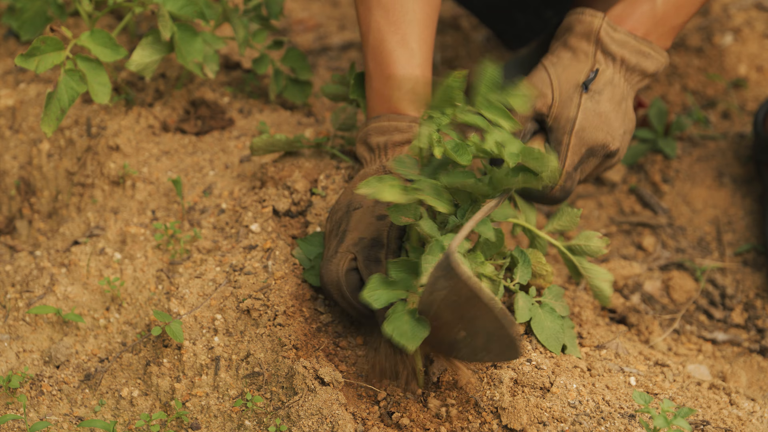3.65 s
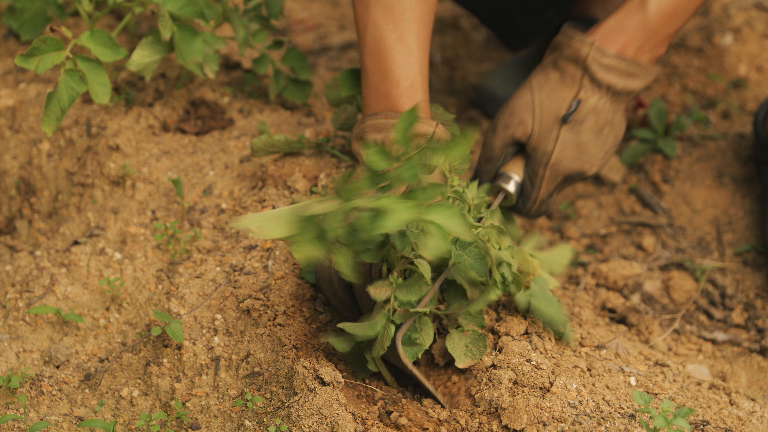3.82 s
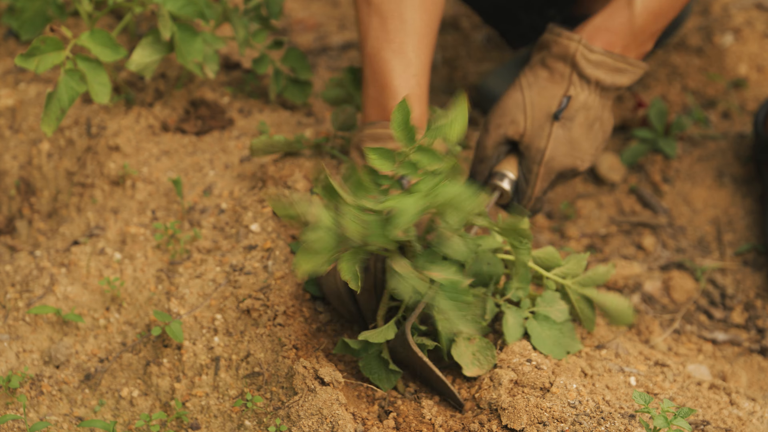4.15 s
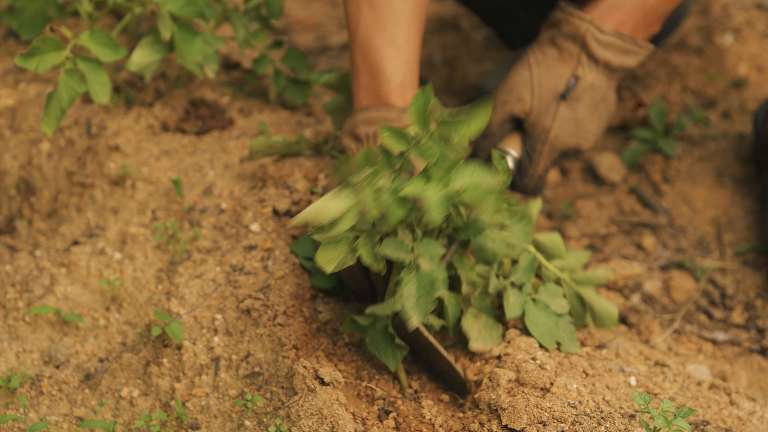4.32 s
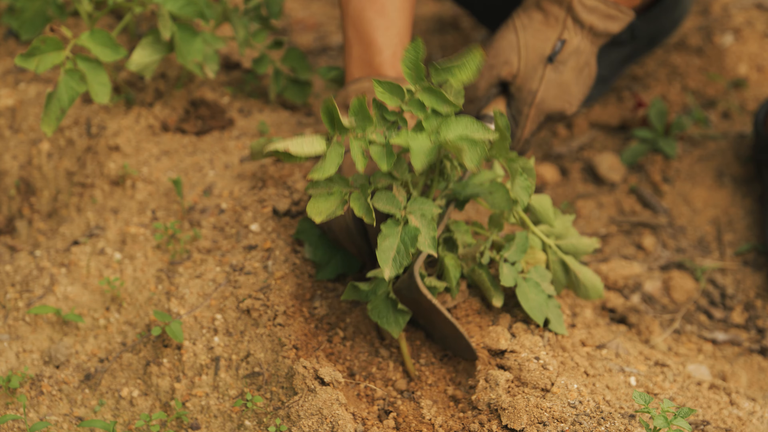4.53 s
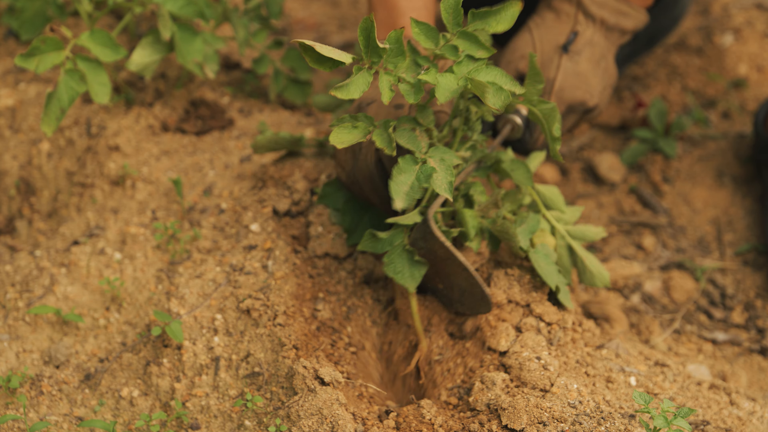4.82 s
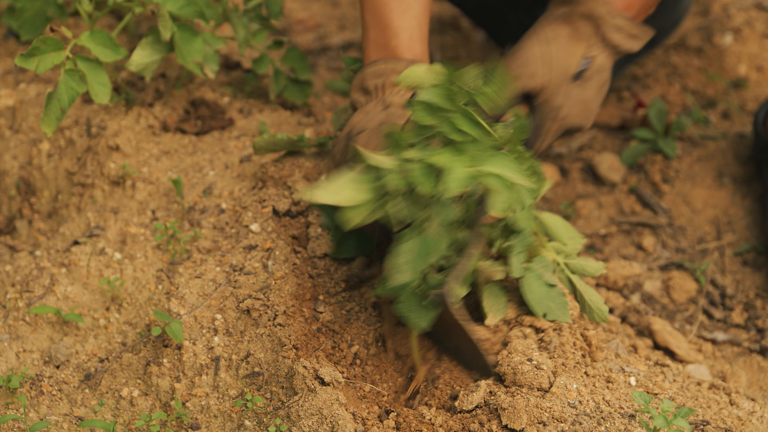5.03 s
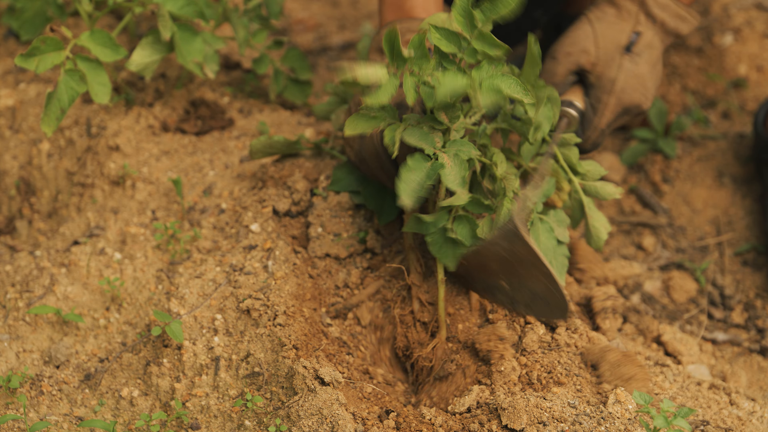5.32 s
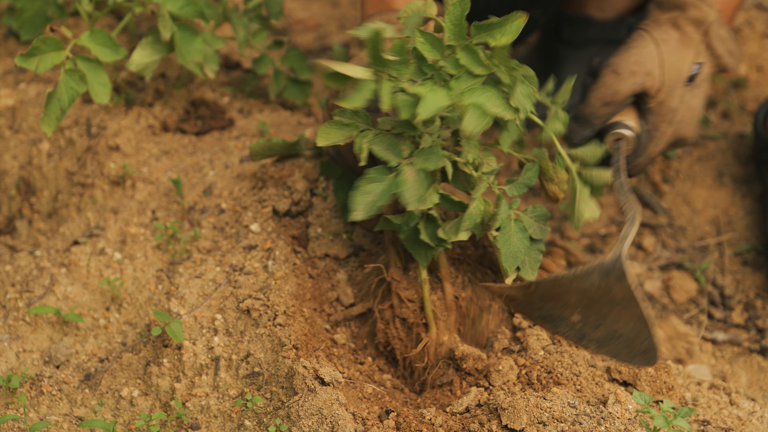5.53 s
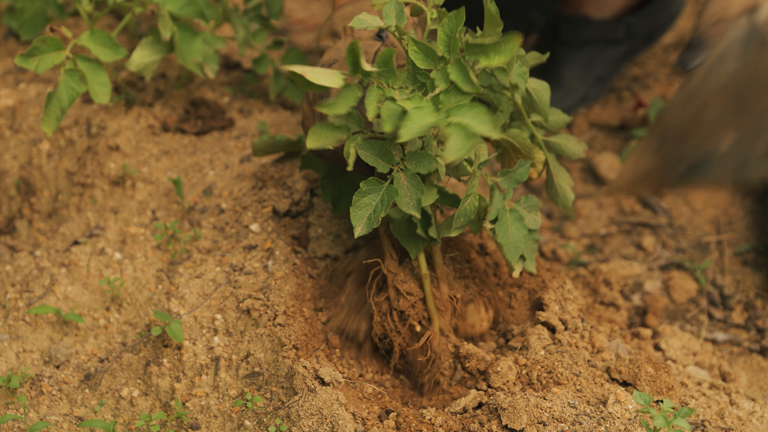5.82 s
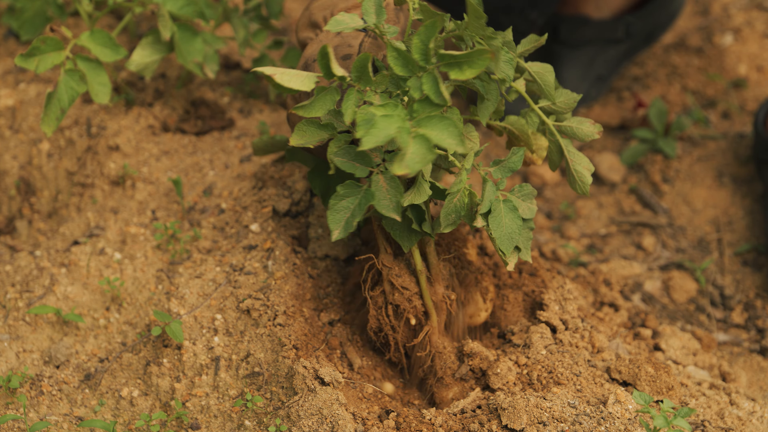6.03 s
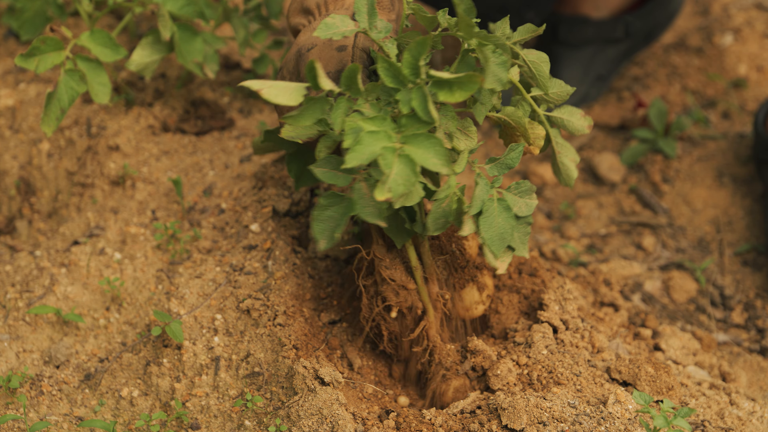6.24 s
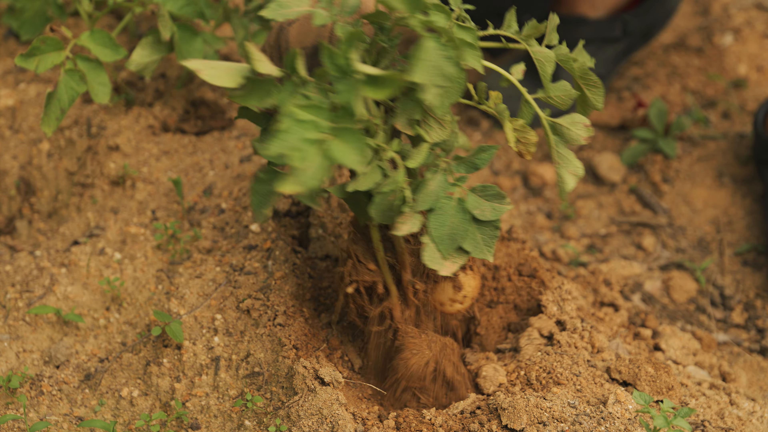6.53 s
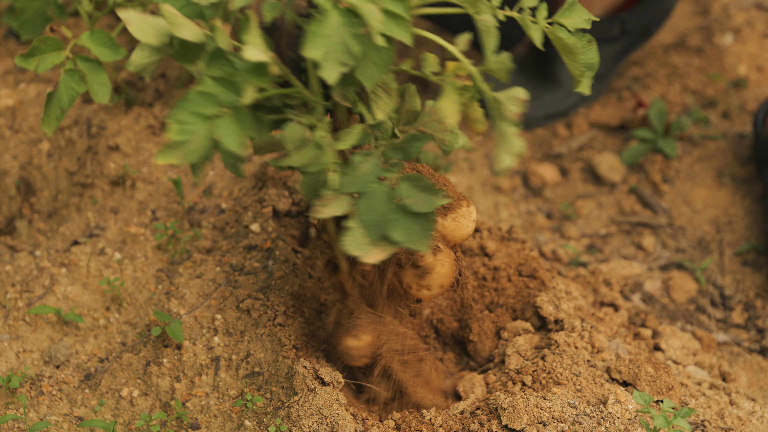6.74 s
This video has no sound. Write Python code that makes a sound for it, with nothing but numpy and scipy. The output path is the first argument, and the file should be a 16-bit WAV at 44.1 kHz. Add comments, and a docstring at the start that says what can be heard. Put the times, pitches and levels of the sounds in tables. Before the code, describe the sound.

A small steel hoe grinds through dry sandy soil close to the microphone, outdoors in a field. Stones and roots crack, and an early hard shove crushes clods with a dull thud. Lighter scrapes follow, then brighter strokes where the blade rings and pebbles tap the metal. The digging weakens and stops, leaving trickling soil, low leaf rustle, a few faint bird whistles and a barely audible distant motor hum.

```python
"""A small steel hoe works dry sandy soil close to a microphone in a field where leaves rustle low.
From the start the blade grinds through sand by stick-slip friction, stones and roots crack, and pebbles
tap the steel. Near 1 s the hardest shove crushes clods and thuds in the ground. From about 3.6 s the
blade often slides free and rings in its own modes. The strokes weaken and end near 6 s, while a few
birds whistle faintly and the hum of a far motor swells, then sinks just before the end."""
import sys
import numpy as np
from scipy import signal
from scipy.fft import rfft, irfft
from scipy.io import wavfile
from scipy.ndimage import uniform_filter1d, map_coordinates

SR = 44100
rng = np.random.default_rng(int(sys.argv[2]) if len(sys.argv) > 2 else 0)


def inscribe(sig):
    """Save sig as 16-bit PCM at rate SR to the path in sys.argv[1].

    A 1-D sig is mono; a 2-D sig holds one channel per row.
    Samples are clipped to [-1, 1] before scaling.
    """
    pcm = np.round(np.clip(np.atleast_2d(sig).T, -1, 1) * 32767)
    wavfile.write(sys.argv[1], SR, pcm.astype(np.int16))


N = 303350
TIME = np.arange(N) / SR

# modes of the steel blade: (frequency [Hz], bandwidth [Hz], level [dB])
BLADE_MODES = [(985, 70, -10), (1390, 120, -12), (1530, 90, -12), (1960, 60, -11), (2255, 35, -2),
               (2770, 60, -9), (3130, 50, -1), (3200, 50, -4), (3530, 32, 1), (4025, 60, -8),
               (4390, 50, -9), (4790, 50, -7), (5000, 100, -4), (5990, 50, -9), (6550, 160, -11),
               (7300, 70, -15), (7880, 70, -9), (8630, 90, -14), (9270, 110, -15), (9570, 70, -15),
               (10300, 60, -9), (10850, 70, -19), (11380, 65, -12), (12450, 110, -18), (13400, 130, -20),
               (14080, 90, -21)]
# strokes through the soil: (peak time [s], rise [s], fall [s], grit level [dB],
# then relative to the grit: clods [dB], fine sand [dB], rustle [dB], blade ring [dB])
STROKES = [(0.019, 0.39, 0.1, -33, -7.5, -7, -32, -35), (0.3, 0.14, 0.13, -36.5, -6.5, 1.5, -6.5, -22),
           (0.48, 0.055, 0.15, -32.5, -13, -4, -21, -30), (0.535, 0.11, 0.062, -31, -11, 2.5, -27, -3.5),
           (1.018, 0.12, 0.22, -25.5, -7.5, -2, -29, -30), (1.132, 0.026, 0.016, -35, 5.5, 10, -14, -30),
           (1.267, 0.036, 0.085, -36.5, 3, 1, -0.5, -30), (1.48, 0.22, 0.096, -44.5, 5, 8.5, -15, -30),
           (1.601, 0.15, 0.066, -36, -4.5, 2, -10, -30), (1.767, 0.11, 0.14, -34.5, -4.5, 3, -13.5, -30),
           (2.005, 0.031, 0.086, -40.5, -30, 11, -23, 3.5), (1.9, 0.054, 0.43, -52, -23, 7, 3.5, -30),
           (3.56, .06, 0.072, -58, -8, -23, 13, -30), (2.496, 0.06, 0.041, -48, -27, 17, -22, -30),
           (2.584, 0.082, 0.15, -41, -32, 2.5, -25, -30), (2.675, 0.05, 0.047, -39, -8, -8, -26, -30),
           (2.81, 0.04, 0.18, -39, -9, -6.5, -21, -30), (2.89, 0.08, 0.31, -44.5, -27, -1, -30, -30),
           (3.168, 0.1, 0.11, -41.5, -17, 2, -4.5, -30), (3.506, 0.057, 0.082, -35, 1, -9, 0.5, -30),
           (3.66, 0.075, 0.09, -36.5, 2.5, -16, -15, 3.5), (3.699, 0.087, 0.039, -37, -2, -5, -16, 4),
           (3.815, 0.06, 0.086, -25, -3, -8.5, -18, -1), (3.996, 0.053, 0.12, -33, -3.5, -13, -16, 1.5),
           (4.045, 0.13, 0.037, -37, -14, -9, -29, 2), (4.13, 0.054, 0.065, -29, 0.5, -11, -19, 0.5),
           (4.26, 0.1, 0.076, -41.5, -6, -21, -28, -30), (4.835, 0.053, 0.12, -42.5, -24, -11.5, -11, -4),
           (4.885, 0.12, 0.059, -46, -19, -17, -13, -9), (5.07, 0.16, 0.26, -46, -9.5, -8, -30, -30),
           (5.17, 0.13, 0.065, -41, -10, -29, -26, -20), (5.223, 0.13, 0.053, -32.5, -7, -18, -16.5, 5),
           (5.285, 0.022, 0.045, -41, -26, -5, -23, -1), (5.495, 0.088, 0.18, -47.5, 2, -16, -22, 4),
           (5.539, .02, .05, -57, -3, 4, -14, 8), (5.655, 0.11, 0.11, -48.5, -8.5, -11.5, -22, -5),
           (5.7, 0.098, 0.062, -47, -12, -14, -22, -10)]


def undb(db):
    """Amplitude ratio of a level in decibels."""
    return 10 ** (np.asarray(db) / 20)


def unit(x):
    """Normalisation to rms 1."""
    return x / np.sqrt(np.mean(x ** 2))


def band(x, lo_hz, hi_hz):
    """Band-pass filtering with gentle skirts."""
    sos = signal.butter(2, [lo_hz, min(hi_hz, .45 * SR)], "bandpass", fs=SR, output="sos")
    return signal.sosfilt(sos, x)


def resonate(x, modes):
    """Parallel resonators, each (frequency [Hz], bandwidth [Hz], level [dB]); roughly keeps white rms."""
    out = sum(undb(db) * signal.lfilter(*signal.iirpeak(hz, hz / width, SR), x)
              for hz, width, db in modes)
    return out / np.sqrt(sum(undb(db) ** 2 * np.pi * width / SR for _, width, db in modes))


def wander(rate_hz):
    """Slow random modulation of rms 1: held values, smoothed twice."""
    hold = int(SR / rate_hz)
    steps = np.repeat(rng.standard_normal(N // hold + 1), hold)
    return unit(uniform_filter1d(uniform_filter1d(steps, hold), hold)[:N])


def curves(table):
    """Linear interpolation of each column over the times in the first."""
    times, *columns = np.transpose(table)
    return [np.interp(TIME, times, column) for column in columns]


def grains(per_s, spread_db, top_db, tail_s, bed_db):
    """Shot-noise envelope: random impacts, mostly small, decay exponentially over a steady bed."""
    chance = rng.random((2, N))
    size_db = np.minimum(-spread_db * np.log(1 - chance[1]), top_db)
    impacts = (chance[0] < per_s / SR) * undb(size_db)
    tails = signal.lfilter([1], [1, -np.exp(-1 / (tail_s * SR))], impacts)
    return unit(unit(tails) + undb(bed_db))


def stroke_envelope(gains, power=1):
    """Strokes add in energy; at power 1 each climbs about 20 dB in its rise and loses it in its fall."""
    rounding, curvature = .027, .85
    peak, rise, fall = np.transpose(STROKES)[:3, :, None]
    lag = TIME[::64] - peak
    distance = lag / np.maximum(np.where(lag < 0, rise, fall), .01)
    effort = undb(-20 * power * (np.hypot(distance, rounding) - rounding) ** curvature)
    return np.interp(TIME, TIME[::64], np.sqrt(np.square(gains) @ effort ** 2))


def grinding(jerks):
    """Stick-slip friction: the blade shears sand in jerks, and each grain size also flickers alone."""
    peak, _, _, db, clod_db, fine_db, _, ring_db = np.transpose(STROKES)
    buried = 1 / np.sqrt(1 + undb(ring_db) ** 2)  # energy in the free blade is lost to the soil
    forces = []
    for gain in size_gains(peak, db, clod_db, fine_db):
        grit = grains(per_s=160, spread_db=-1, top_db=10, tail_s=.0012, bed_db=15.5)
        forces.append(jerks * grit * stroke_envelope(gain * buried) * undb(.89 * wander(30)))
    return shifting_mix(soil_noise(forces))


def size_gains(time, db, clod_db, fine_db):
    """Grain size distribution: amplitudes of grit, clods, small grit and fine sand."""
    # small grit over the mean of the grit and fine sand levels: (time [s], level [dB])
    small_grit = [(0, -8), (.5, -9.5), (.8, -3), (1.05, -6.5), (1.25, 1.5), (1.5, -23), (1.8, 2), (2.2, -9),
                  (2.55, 3.5), (2.9, 4), (3.2, -7), (3.6, 1), (3.85, -0.5), (4.2, 3.5), (4.8, 5),
                  (5.2, 0.5), (5.7, -1), (6.88, 1.5)]
    small_db = fine_db / 2 + np.interp(time, *np.transpose(small_grit))
    return undb([db, db + clod_db, db + small_db, db + fine_db])


def soil_noise(forces):
    """Incoherent sources: each grain size rattles as independent noise in its own band."""
    # bands of grit, clods, small grit and fine sand: (low edge [Hz], high edge [Hz])
    size_bands = [(1503, 3610), (488, 1326), (3060, 7370), (5560, 10900)]
    return sum(band(force * rng.standard_normal(N), lo, hi) * np.sqrt(SR / 2 / (hi - lo))
               for force, (lo, hi) in zip(forces, size_bands))


def shifting_mix(x, depth_db=1.6):
    """Spectral modulation: as the mix of grain sizes changes, patches of the spectrum swell and sink."""
    spectrum = signal.stft(x, nperseg=512)[2]
    patches = uniform_filter1d(rng.standard_normal(spectrum.shape), size=9, axis=0)
    patches = unit(uniform_filter1d(patches, size=3, axis=1))
    gain = undb(depth_db * patches - .115 * depth_db ** 2)  # the offset keeps the mean power
    return signal.istft(spectrum * gain, nperseg=512)[1][:N]


def blade_rubbing(jerks):
    """Forced vibration: friction drives the freed blade; each mode swells alone as the contact moves."""
    contrast, damping = .7, 1.4  # rubbing evens out the modes and widens them
    _, _, _, grit_db, _, _, _, ring_db = np.transpose(STROKES)
    friction = jerks * stroke_envelope(undb(grit_db + ring_db), power=1.29) * rng.standard_normal(N)
    norm = np.sqrt(sum(undb(contrast * db) ** 2 * width for _, width, db in BLADE_MODES))
    out = np.zeros(N)
    for hz, width, db in BLADE_MODES:
        mode = resonate(friction * undb(3 * wander(60) - 1), [(hz, damping * width, 0)])
        out += undb(contrast * db) * np.sqrt(width) / norm * soil_loading(mode)
    return out


def soil_loading(mode, bend=.003):
    """Mass loading: soil on the blade makes the pitch of a mode wander slightly."""
    shift = bend * SR / 60 * wander(10)
    return map_coordinates(mode, [np.arange(N) + shift], mode="mirror")


def cracking():
    """Brittle fracture: stones and roots snap with a pitched tick; crushed clods swell and splinter."""
    # stones and roots: (time [s], peak [dB], relative clods [dB], relative fine sand [dB], pitch [Hz])
    cracks = [(0.063, -14, -17, -15, 2770), (0.16, -23, 4, -10, 2020), (0.214, -26.5, -12, 13, 2470),
              (0.2743, -18, -5, -3, 2670), (0.44, -27, -15, -9, 2520), (0.583, -27, -6, 9, 3510),
              (0.7116, -35.5, -14, 17.5, 2570), (0.758, -20.5, -20, -5, 2900), (0.778, -23, -26, -14, 2700),
              (0.9615, -16, -14, 0, 2500), (0.819, -21, -28, -8, 3130), (0.83, -22, -30, -11, 2640),
              (0.971, -7.5, -7, -7, 2400), (1.0017, -6, -13, -9, 2540), (1.031, -18, 6.5, -8, 2900),
              (1.1283, -21, -8, 11, 1170), (1.1992, -30, 16, -13, 1220), (1.232, -39, -9, 14, 1040),
              (1.255, -15.5, 7, -2, 2550), (1.3117, -27.5, 4, 9.5, 1160), (1.599, -28, -21, -8, 1806),
              (1.7578, -24, -9, 5, 1910), (1.773, -41, -10, 7, 3000), (1.7663, -15, 6, -18, 1450),
              (1.853, -18.5, -17, -3, 1580), (1.88, -28, -17, 9.5, 3210), (1.947, -33, -17, 12, 2220),
              (1.982, -38, -20, -7, 3460), (2.0923, -40, -3, 17, 1240), (2.1256, -28, -22, -15, 1570),
              (2.17, -29, -8, -4, 2100), (2.200, -29, -18, 5, 1900), (2.295, -31.5, -4, -13, 2300),
              (2.4369, -38.5, -22, 21, 3520), (2.459, -26, -11, 16.5, 3060), (2.4864, -20.5, -17, 1, 3400),
              (2.576, -25, -23, -4, 2340), (2.663, -20.5, -26, 7, 2900), (2.794, -18, -24, -20, 2600),
              (2.816, -18.5, -16, 4, 2960), (2.883, -15.5, -34, -14, 3100), (2.9242, -21.5, -16, -23, 2920),
              (2.996, -30.5, -10, 6, 3140), (3.0219, -39, -16, 13, 2490), (3.054, -27, -20, 6.5, 3330),
              (3.229, -28, -12, 4.5, 2810), (3.2406, -29, -16, 0, 1850), (3.429, -33, -13, 1, 1530),
              (3.4507, -34, 1, -9, 1120), (3.72, -20, -11, -12, 3520), (3.7822, -23, 6, -13, 3510),
              (3.797, -9, -12, -2, 3200), (3.847, -13, -6, -21, 2550), (3.9813, -18.5, -10, -23, 1800),
              (4.0248, -17, 0, -14, 1580), (4.1111, -9.5, -23, -2, 3300), (4.397, -28, -13, -26, 2380),
              (4.988, -33, -1, -8, 1710), (5.2695, -41, -20, 12, 3500), (5.535, -39, -15, 7, 3130),
              (5.638, -26.5, -18, -17, 3200), (5.663, -33, -14, -16, 3190), (6.157, -35, -13, -18, 3590),
              (6.7283, -31, -18, -18, 1680)]
    # crushed clods: (start [s], peak [s], end [s], level [dB],
    # relative clods [dB], relative fine sand [dB])
    crunches = [(.901, .9025, .916, -24, -5, 4), (.907, .917, .9245, -20.5, -1, 1),
                (2.542, 2.554, 2.566, -28, -14, 4), (2.64, 2.661, 2.67, -29, -14, 2),
                (3.125, 3.135, 3.162, -29, -10, 2), (3.466, 3.472, 3.487, -36, 13, -10)]
    crack_t60_s, crumb_t60_s, crumb_db = .006, .035, -15
    tick_db, tick_t60_cycles = -11, 30
    forces, ticks, t = np.zeros((4, N)), np.zeros(N), TIME[:SR // 10]
    crumbs = undb(crumb_db) * 1000. ** (-t / crumb_t60_s)
    decay = (1000. ** (-t / crack_t60_s) + crumbs) / 3  # noise peaks near three times its rms
    for time, db, clod_db, fine_db, hz in cracks:
        span = slice(int(time * SR), int(time * SR) + len(t))
        forces[:, span] += size_gains(time, db, clod_db, fine_db)[:, None] * decay
        tick = 1000. ** (-t * hz / tick_t60_cycles) * np.sin(2 * np.pi * hz * t)
        ticks[span] += undb(db + tick_db) * tick
    splinters = grains(per_s=2500, spread_db=2.5, top_db=8, tail_s=.0004, bed_db=4)
    for start, peak, end, db, clod_db, fine_db in crunches:
        crush = np.interp(TIME, [start, peak, end], [0, 1, 0]) * splinters
        forces += undb(db + np.array([[0], [clod_db], [fine_db / 2], [fine_db]])) * crush
    return soil_noise(forces) + ticks


def clump_bursts():
    """Band-limited noise: like-sized grains give way together and rattle around one pitch."""
    # clumps of grit: (start [s], peak [s], end [s], level [dB], pitch [Hz], bandwidth [Hz])
    clumps = [(0.44, .443, .455, -39, 2500, 700), (0.457, 0.478, .5, -43, 2900, 600),
              (0.487, 0.511, .525, -30.5, 1460, 1210), (0.54, .55, .556, -35, 5000, 300),
              (.669, 0.674, .686, -36, 9300, 3000), (0.947, 0.99, 1.075, -28, 2720, 1640),
              (1.028, 1.033, 1.042, -21.5, 900, 398), (1.022, 1.05, 1.075, -31, 6900, 1500),
              (1.701, 1.71, 1.712, -30, 2500, 500), (1.708, 1.713, 1.719, -25, 2230, 900),
              (1.74, 1.74, 1.75, -24.5, 1640, 1400), (1.41, 1.415, 1.43, -36, 8000, 4000),
              (1.81, 1.826, 1.835, -31, 9100, 5000), (1.983, 2.002, 2.02, -32, 3100, 1300),
              (3.129, 3.133, 3.155, -24, 6700, 2500), (3.692, 3.692, 3.703, -30, 3020, 2480),
              (3.78, 3.81, 3.85, -28.5, 4850, 900), (3.975, 3.99, 4.01, -37, 5100, 1200),
              (5.15, 5.181, 5.19, -39, 3750, 700), (5.275, 5.289, 5.298, -39, 3780, 1500),
              (5.48, 5.485, 5.51, -49, 8900, 1500), (5.838, 5.888, 5.945, -43, 1440, 1100),
              (6.052, 6.085, 6.11, -54, 1300, 500)]
    out = np.zeros(N)
    rattle = grains(per_s=1100, spread_db=8, top_db=8, tail_s=.0011, bed_db=14) * rng.standard_normal(N)
    for start, peak, end, db, hz, width in clumps:
        span = slice(int(start * SR), int(end * SR) + 512)
        corners = [start, max(peak, start + .001), max(end, peak + .001)]
        burst = np.interp(TIME[span], corners, [0, 1, 0]) * rattle[span]
        out[span] += undb(db) * band(burst, hz - width / 2, hz + width / 2) * np.sqrt(SR / 2 / width)
    return out


def pebble_taps():
    """Free vibration: a tap excites every blade mode, in proportions set by where it lands."""
    # taps: (time [s], level [dB], tilt [dB/octave], frequency that the spot favours [Hz])
    taps = [(.528, -30, 1, 3530), (.525, -32, -2, 2255), (.55, -39, -2, 2255), (.535, -40, 4, 10300),
            (.618, -48, 0, 3530), (3.66, -45, 1, 2255), (3.69, -41, 1, 3130), (3.698, -40, 0, 10300),
            (3.797, -34, 3, 5000), (4.03, -40, 2, 7880), (4.035, -42, 0, 3130), (4.111, -33, 1, 3130),
            (5.205, -35, 1, 3530), (5.21, -38, 0, 2255), (5.225, -42, 2, 11380), (5.245, -39, 1, 3200),
            (5.27, -48, 3, 11380), (5.284, -45, 2, 3530), (5.535, -46, 5, 3530), (5.536, -47, 3, 3130)]
    favour_db, favour_octaves, attack_s = 9, .1, .0015
    damping = .72  # a tapped blade is damped less than a rubbed one
    out, t = np.zeros(N + SR), TIME[:SR // 4]
    hz, width, mode_db = np.transpose(BLADE_MODES)[:, :, None]
    modes = np.exp(-np.pi * damping * width * t) * np.sin(2 * np.pi * hz * t)
    for time, db, tilt_db, spot_hz in taps:
        spot_db = favour_db * np.exp(-(np.log2(hz / spot_hz) / favour_octaves) ** 2)
        scatter_db = rng.standard_normal(hz.shape)
        gains = undb(db + mode_db + tilt_db * np.log2(hz / 3500) + scatter_db + spot_db)
        onset = int(time * SR)
        out[onset:onset + len(t)] += np.sum(gains * modes, axis=0) * np.minimum(t / attack_s, 1)
    return out[:N]


def trickling():
    """Granular flow: countless impacts of loose soil merge into a hiss, and lone grains stand out."""
    # loose soil: (time [s], grit level [dB], relative clods [dB], relative fine sand [dB])
    trickle = [(0.0, -47.5, -4, 5.5), (0.42, -42.5, -6, -8.5), (0.59, -56, 0.5, 8), (0.82, -56.5, -8.5, -1),
               (1.07, -49.5, 15, -26), (1.3, -70, 7, -20), (1.72, -48.5, -13, 5.5), (2.3, -58.5, 3.5, 3),
               (2.81, -57.5, -2, -18), (3.27, -58.5, 5.5, -4), (3.43, -59.5, 8.5, -5),
               (3.85, -51.5, -14, -37), (4.1, -47.5, -25, -23), (4.37, -58, -2.5, -14.5),
               (4.69, -57.5, 0.5, -13.5), (5.13, -60, 0, -19), (5.27, -57, -1.5, -5), (6.88, -63, 1, -6)]
    # lone grains relative to the smooth flow: (time [s], level [dB])
    crackle = [(0, -6), (2.1, -1), (3.3, -5), (4.3, -4), (5.7, -51), (6.88, -15)]
    sway, lone_gain = undb(2.1 * wander(18)), undb(curves(crackle)[0])
    forces = []
    for gain in size_gains(TIME, *curves(trickle)):
        lone = lone_gain * grains(per_s=60, spread_db=1.5, top_db=23, tail_s=.00083, bed_db=-64)
        forces.append((1 + lone) * sway * gain * undb(.92 * wander(30)))
    return soil_noise(forces)


def ground_thuds():
    """Damped oscillation: each shove rings the packed ground, over its resonant rumble."""
    # ground resonances: (frequency [Hz], bandwidth [Hz], level [dB])
    ground_modes = [(120, 20, -1), (151.7, 38, 0.5), (180.6, 13, -8.5)]
    # rumble of the ground: (time [s], level [dB])
    rumble = [(0.0, -43.5), (0.69, -59.5), (0.86, -59), (0.92, -29), (1.21, -46.5), (1.24, -40.5),
              (1.74, -58.5), (1.8, -41), (1.88, -61), (2.47, -61), (2.61, -44), (2.66, -60), (2.83, -42),
              (2.93, -64), (3.1, -49.5), (3.16, -40), (3.43, -52.5), (3.49, -28.5), (3.58, -55.5),
              (6.88, -58)]
    # shoves: (time [s], level [dB], pitch [Hz], 60 dB decay time [s])
    shoves = [(0.083, -29, 238, 0.069), (0.113, -39, 130, 0.12), (0.306, -33, 139, 0.072),
              (0.908, -12, 236, 0.059), (0.942, -35, 143, 0.082), (0.965, -20, 98.5, 0.1),
              (1.257, -27.5, 146, 0.19), (1.527, -28, 166, 0.085), (1.781, -27.5, 150, 0.11),
              (2.552, -35, 262, 0.12), (2.592, -33.5, 120, 0.17), (2.705, -32.5, 108, 0.11),
              (2.804, -29.5, 153, 0.16), (3.141, -28, 201, 0.19), (3.162, -16, 110.7, 0.1),
              (3.199, -33, 144.5, 0.3), (3.309, -36, 142, 0.15), (3.468, -38, 182, 0.092),
              (3.471, -21.5, 390, 0.076), (3.489, -33, 157, 0.056), (3.505, -30, 483, 0.08)]
    out = unit(resonate(rng.standard_normal(N), ground_modes))
    out *= undb(curves(rumble)[0] + 3.2 * wander(13))
    for time, db, hz, t60 in shoves:
        t = np.maximum(TIME - time, 0)
        attack = np.minimum(t / .0046, 1)
        out += undb(db) * attack * 1000. ** (-t / t60) * np.sin(2 * np.pi * hz * t)
    return out


def leaf_rustle():
    """Power addition: the low, fluttering noise of leaves in the breeze grows with each stroke."""
    # leaves and breeze: (time [s], level [dB])
    breeze = [(0.0, -68), (0.48, -43.5), (0.65, -55), (0.94, -65), (1.07, -38.5), (1.13, -40),
              (1.51, -54.5), (1.78, -62), (2.26, -49.5), (2.78, -57), (3.14, -59.5), (3.35, -47.5),
              (3.64, -63), (3.79, -62), (4.23, -56), (4.66, -54.5), (6.19, -58), (6.88, -55)]
    _, _, _, grit_db, _, _, rustle_db, _ = np.transpose(STROKES)
    envelope = np.hypot(undb(curves(breeze)[0]), stroke_envelope(undb(grit_db + rustle_db)))
    return unit(band(rng.standard_normal(N), 240, 465)) * envelope * undb(2.2 * wander(24.96))


def birds():
    """Frequency and amplitude modulation: thin, falling whistles waver with the air."""
    # far whistles: (start [s], end [s], start pitch [Hz], end pitch [Hz], level [dB])
    whistles = [(.725, 0.813, 5950, 5600, -47), (4.687, 4.82, 3750, 3550, -57),
                (5.29, 5.44, 4400, 3950, -59.5), (5.94, 6.02, 3770, 3650, -58),
                (5.995, 6.055, 3550, 2950, -58), (6.02, 6.12, 3740, 3600, -61)]
    out = np.zeros(N)
    waver, flutter_db = 1 + .01 * wander(180), 3 * wander(80)
    for start, end, start_hz, end_hz, db in whistles:
        span = slice(int(start * SR), int(end * SR))
        progress = (TIME[span] - start) / (end - start)
        hz = (start_hz + (end_hz - start_hz) * progress) * waver[span]
        swell = np.sqrt(np.abs(np.sin(np.pi * progress)))
        out[span] += undb(db + flutter_db[span]) * swell * np.sin(2 * np.pi * np.cumsum(hz) / SR)
    return out


def far_motor(hum_hz=102.3):
    """Periodic vibration: a far motor gives one low tone that wavers in pitch and level."""
    # hum: (time [s], level [dB])
    hum_levels = [(0, -79), (5.2, -59.5), (5.8, -58), (6.45, -57), (6.6, -75), (6.88, -75)]
    hz = hum_hz * (1 + .015 * wander(6))
    return np.sin(2 * np.pi * np.cumsum(hz) / SR) * undb(curves(hum_levels)[0] + 3 * wander(8))


def open_air(level_db=-60.5):
    """Spectrally shaped noise: the nearly steady background of the field."""
    # background spectrum: (frequency [Hz], relative spectral density [dB])
    air_spectrum = [(24, -57), (40, -14), (68, 35), (124, -5), (237, 8), (297, -12), (467, -48), (529, -57),
                    (1070, -19), (3140, -27), (7170, -34), (13100, 1), (16000, -52)]
    hz, db = np.transpose(air_spectrum)
    bin_hz = np.arange(N // 2 + 1) * SR / N
    shape = undb(np.interp(np.log(bin_hz + 1), np.log(hz), db))
    return unit(irfft(rfft(rng.standard_normal(N)) * shape, N)) * undb(level_db + wander(4.2))


def scene():
    """Superposition in one channel; the same stick-slip jerks drive both soil and blade."""
    jerks = grains(per_s=450, spread_db=3.5, top_db=8, tail_s=.0012, bed_db=4) * undb(wander(45))
    hoe = grinding(jerks) + blade_rubbing(jerks) + cracking() + clump_bursts() + pebble_taps()
    earth = trickling() + ground_thuds()
    return (hoe + earth + leaf_rustle() + birds() + far_motor() + open_air())[None]


def record(dry):
    """Self-noise and band limiting: the microphone hisses and cuts deep bass, the recorder the top."""
    hiss_db, bass_hz, top_hz = -70.5, 94, 15900
    hissy = dry + undb(hiss_db) * rng.standard_normal(N)
    thin = signal.sosfilt(signal.butter(7, bass_hz, "highpass", fs=SR, output="sos"), hissy)
    return signal.sosfilt(signal.ellip(10, .2, 70, top_hz, fs=SR, output="sos"), thin)


dry = scene()
out = record(dry)
inscribe(out)
```